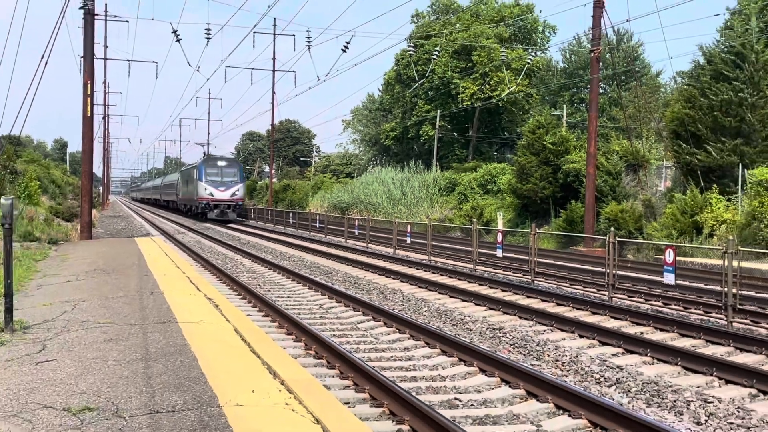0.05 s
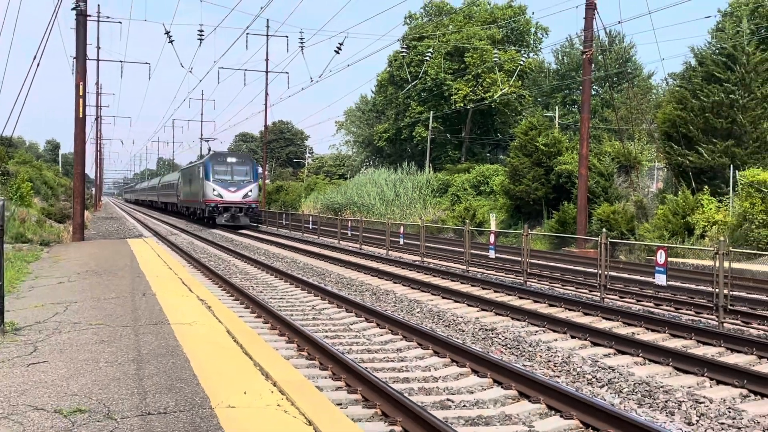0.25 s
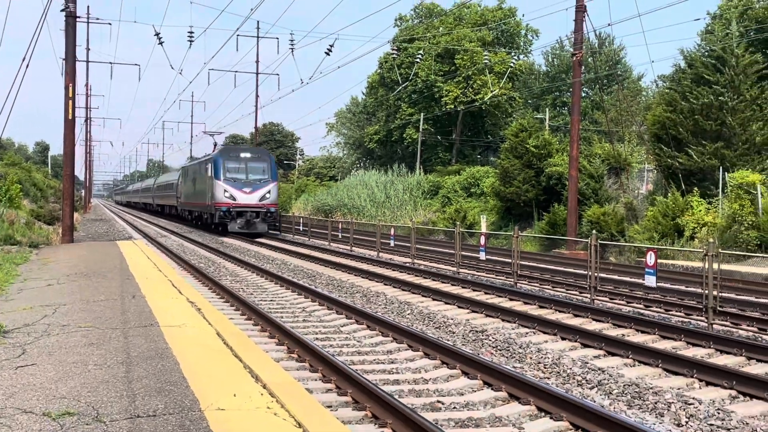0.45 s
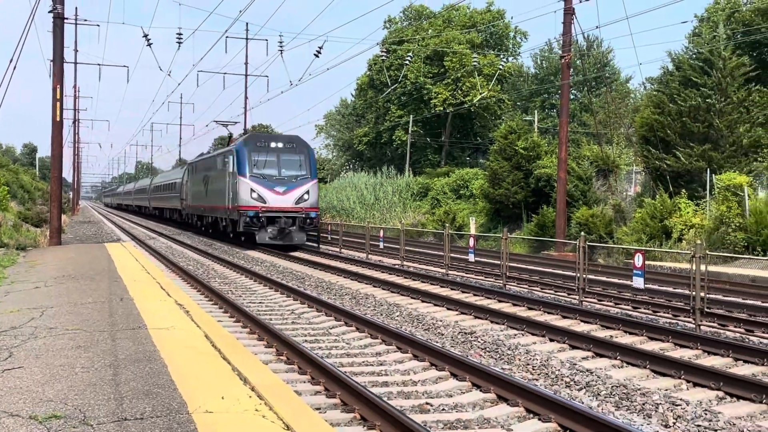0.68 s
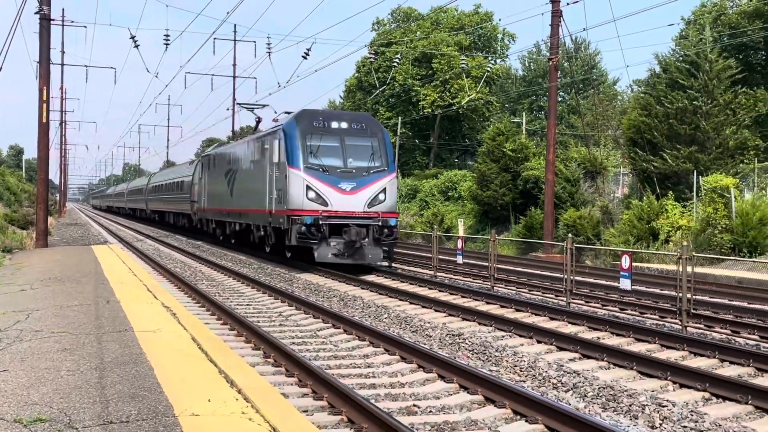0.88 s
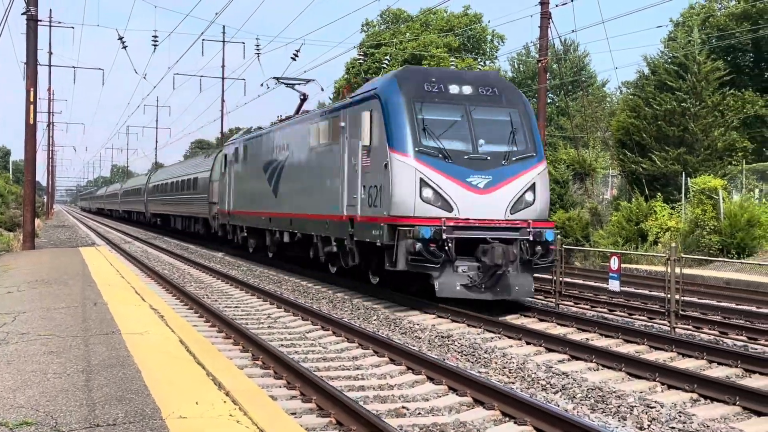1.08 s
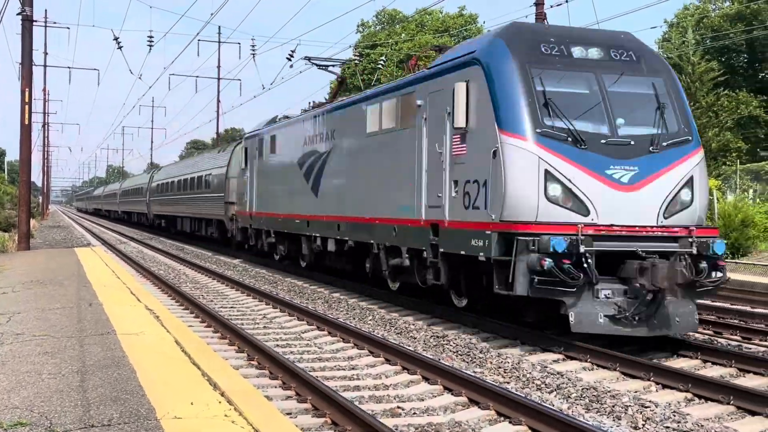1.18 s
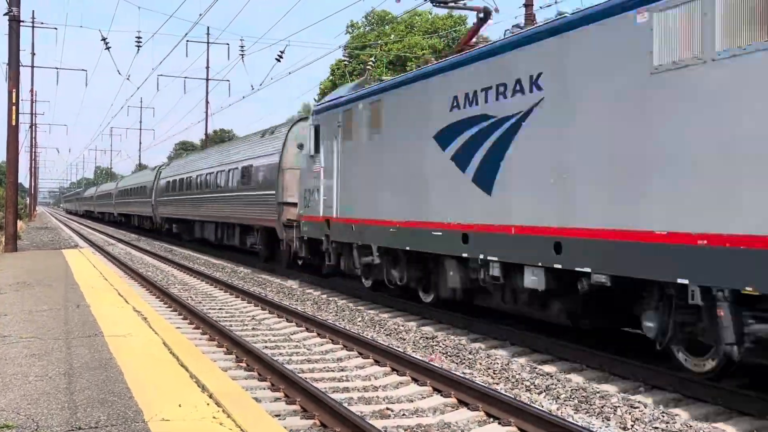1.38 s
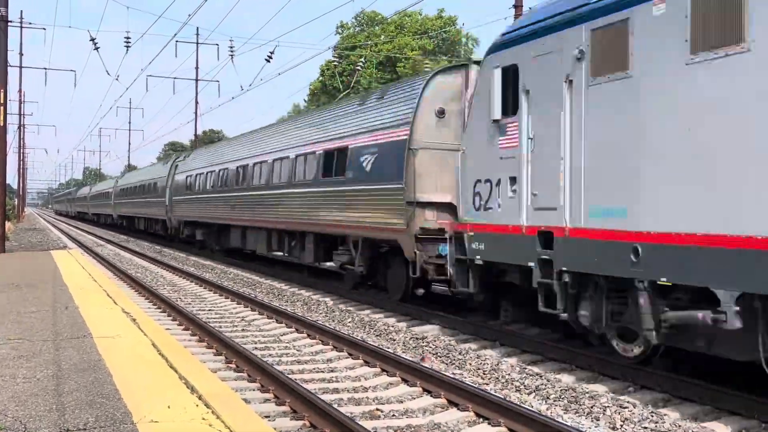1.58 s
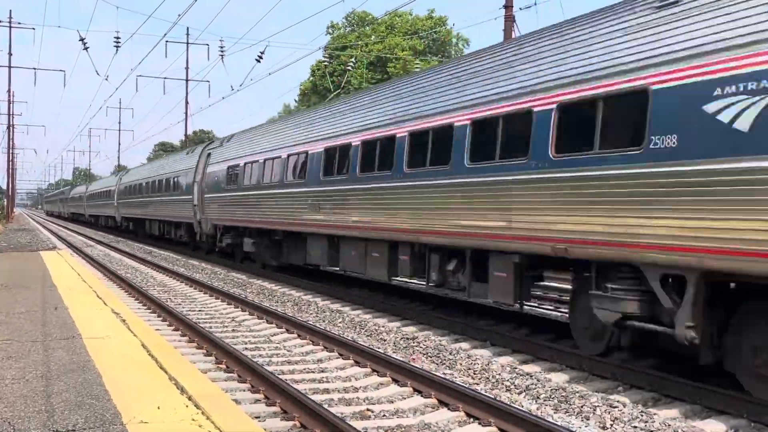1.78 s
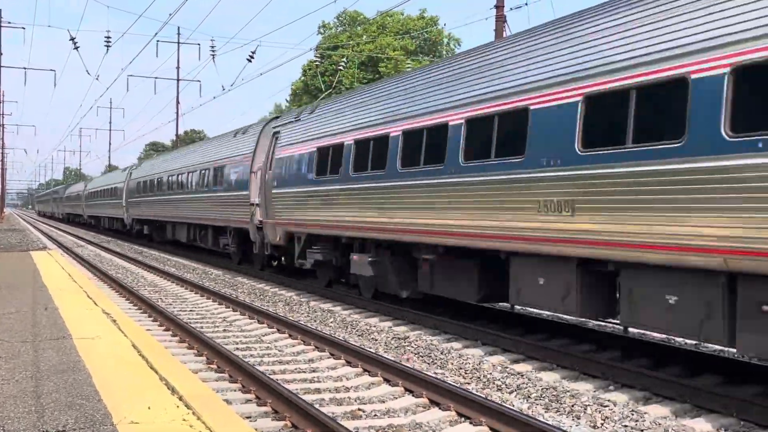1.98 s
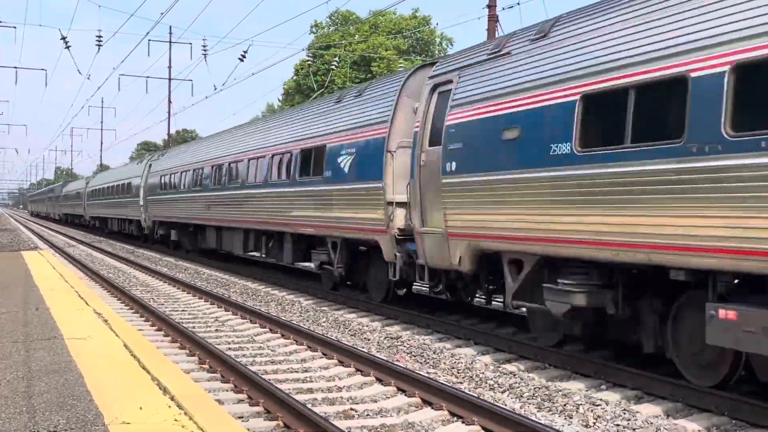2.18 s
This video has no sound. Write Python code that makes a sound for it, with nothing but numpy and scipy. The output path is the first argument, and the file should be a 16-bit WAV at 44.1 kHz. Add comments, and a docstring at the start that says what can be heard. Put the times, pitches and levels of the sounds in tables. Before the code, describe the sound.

A fast electric train rushes past a platform, rails hissing first, then roar and ringing wheels

```python
"""Electric train passing a platform

An electric locomotive and its coaches pass at speed. Rails hiss (shaped noise) and whistle (wavering
sines) before it arrives; roar and air rush (shaped noise, narrow howling resonances) swell. Bogies go by
with ringing wheels (noise through resonances that fall in pitch) and low buffeting (shaped noise), while
brief gliding tones and low thuds (sines in Gaussian envelopes) come from the running gear and the air."""
import sys
import numpy as np
from scipy import signal
from scipy.fft import rfft, irfft
from scipy.io import wavfile

SR = 44100
rng = np.random.default_rng(int(sys.argv[2]) if len(sys.argv) > 2 else 0)


def log_audio(samples):
    """Write samples as a 16-bit WAV file to the path given in sys.argv[1]."""
    # one column per channel
    frames = np.atleast_2d(samples).T
    # limit to full scale, then quantise
    limited = np.clip(frames, -1, 1)
    pcm = np.round(limited * 32767).astype(np.int16)
    wavfile.write(sys.argv[1], SR, pcm)


N = 99225
T = np.arange(N) / SR
STFT = dict(nperseg=1024, noverlap=768)  # samples
HZ, FRAME_S, _ = signal.stft(T, SR, **STFT)
IMAGE_EDGE_HZ = 2120  # above this the bearing-dependent channel differences fade

# phase and likeness of the channels; they oppose in two treble bands:
# f/Hz, phase lag of right/rad, likeness factor 0-1
TREBLE_PAIR = [(6200, 0, 1), (6500, -.45, .88), (7400, -1.4, .82), (7800, -3.1, 1), (8700, -3.2, 1),
               (9200, -4, .87), (10300, -5.2, .8), (10500, -6.283, 1), (12950, -6.283, 1), (13300, -8, .6),
               (13900, -9.425, 1)]


def amp(db):
    """Level to amplitude ratio: 20 dB is a factor of ten."""
    return 10 ** (np.asarray(db) / 20)


def curve(rows, t=T, order=1):
    """Linear interpolation of one table column over time."""
    rows = np.array(rows)
    return np.interp(t, rows[:, 0], rows[:, order])


def colour(rows, order=1):
    """Interpolation of one table column over logarithmic frequency."""
    rows = np.array(rows)
    return np.interp(np.log(HZ + 1), np.log(rows[:, 0]), rows[:, order])[:, None]


def spectra(x):
    """Short-time Fourier analysis: sound to a spectrum per frame."""
    return signal.stft(x, SR, **STFT)[2]


def wave(z):
    """Overlap-add synthesis: short-time spectra back to sound."""
    return signal.istft(z, SR, **STFT)[1][..., :N]


def wander(rate_hz):
    """Low-passed Gaussian noise: a smooth random fluctuation of unit rms."""
    spectrum = rfft(rng.standard_normal(2 * N))
    hz = np.fft.rfftfreq(2 * N, 1 / SR)
    x = irfft(spectrum * np.exp(-(hz / rate_hz) ** 2))[:N]
    return x / x.std()


def below(hz):
    """Low-pass weighting: near one under a frequency, falling steeply to zero above it."""
    return 1 / (1 + (HZ[:, None] / hz) ** 10)


def by_bearing(rows):
    """Change of bearing: blends the 'ahead' and 'alongside' columns as the train draws level."""
    # share of the alongside column: t/s, share 0-1
    alongside = [(1.35, 0.13), (1.6, 0.42), (1.75, .45), (1.92, 0.74)]
    share = np.clip(curve(alongside, FRAME_S), 0, 1)
    return colour(rows, order=1) * (1 - share) + colour(rows, order=2) * share


def peak(hz, width_hz):
    """Resonance: unit gain at the centre, falling with the square of the detuning."""
    return 1 / (1 + ((HZ[:, None] - hz) / (0.82 * width_hz)) ** 2)


def modes(rows, ratio=1):
    """Modal superposition: resonances add in power, their centres scaled by a Doppler ratio."""
    power = sum((amp(db) * peak(hz * ratio, width)) ** 2 for hz, width, db in rows)
    return np.sqrt(power)


def tone(hz, db):
    """Phase accumulation: a sine that follows a pitch and an rms level."""
    cycles = np.cumsum(hz * np.ones(N)) / SR + rng.random()
    return np.sqrt(2) * amp(db) * np.sin(2 * np.pi * cycles)


def swell(s, half, hz, db):
    """Gaussian envelope: a tone that rises and fades around one moment."""
    return tone(hz, db) * np.exp(-((T - s) / half) ** 2)


def howl(hz, width_hz, db):
    """Narrow-band noise: two random quadrature amplitudes, as of a mode kept ringing by turbulence."""
    turn = 2 * np.pi * hz * T
    return amp(db) * (wander(width_hz) * np.cos(turn) + wander(width_hz) * np.sin(turn))


def rush(gain, level_db, flutter_db, flutter_hz):
    """Turbulent noise: partly coherent channels given a spectrum, a level curve and a random flutter."""
    # likeness of left and right, before the image edge and treble factor:
    # f/Hz, ahead 0-1, alongside 0-1
    likeness = [(290, 1, 1), (470, 1, 0.63), (710, 0.69, 0.86), (940, 0.66, 1), (1150, 1, 0.88),
                (1580, 0.66, 0.2), (1630, 0, 0), (2100, .98, 0.81), (3140, 1, 1)]
    mid, side = spectra(rng.standard_normal((2, N)) * np.sqrt(SR / 2))  # unit density per Hz
    same = np.clip(1 - (1 - by_bearing(likeness)) * below(IMAGE_EDGE_HZ), 0, 1)
    same = same * colour(TREBLE_PAIR, order=2)
    mid = mid * np.sqrt((1 + same) / 2)
    side = side * np.sqrt((1 - same) / 2)
    noise = wave(np.array([mid + side, mid - side]) * gain)
    return noise * amp(level_db + flutter_db * wander(flutter_hz))


def rails():
    """Structure-borne sound: the rails hiss, and their high modes whistle ahead of the train."""
    # spectra before the level curves: f/Hz, density/dB per Hz
    hiss_spectrum = [(25, -88), (55, -58), (85, -56.5), (150, -73), (330, -68.5), (460, -71), (700, -63),
                     (1150, -59.5), (1500, -65), (1950, -68), (2750, -65.5), (3600, -73.5), (8000, -83.5),
                     (14000, -100)]
    sizzle_spectrum = [(6000, -110), (9000, -80.5), (11500, -81.5), (12800, -84), (16000, -91)]  # hiss around the whistling modes
    # level curves: t/s, level/dB
    hiss_level = [(0, -1.5), (.45, 1), (.9, 2), (1.25, 3.5), (1.5, -34), (1.85, -30), (2.25, -5.5)]
    whistle_level = [(0, -0.5), (.3, 0.5), (.9, 1), (1.15, 2), (1.35, -31), (1.8, -27), (2.25, -12)]
    # high modes carried along the rails, before the level curve: f/Hz, level/dB
    whistles = [(9720, -79), (10440, -66), (11205, -53.5), (11910, -54), (12680, -67), (13430, -64)]
    waver_hz, flicker_db, rate_hz = 15, 2.5, 59  # rms pitch waver, rms flicker, rate of both

    hiss = rush(amp(colour(hiss_spectrum)), curve(hiss_level), flutter_db=0.93, flutter_hz=70)
    sizzle = rush(amp(colour(sizzle_spectrum)), curve(whistle_level), flutter_db=2.2, flutter_hz=60)
    singing = sum(tone(hz + waver_hz * wander(rate_hz), db + flicker_db * wander(rate_hz))
                  for hz, db in whistles)
    return hiss + sizzle + singing * amp(curve(whistle_level))


def running_gear():
    """Frequency modulation: gliding, wavering tones of the running gear, with steady thuds of air."""
    # narrow tones: t/s, envelope 1/e half length/s, f/Hz at t, glide/Hz per s, width/Hz, level/dB
    gear_tones = [(0.315, 0.48, 82, -0.5, 2.6, -41), (1.191, 0.27, 378, -15, 5, -35.5),
                  (1.7, .09, 314, -69, 10, -34.5), (1.915, .03, 1162, -400, 25, -17.5),
                  (1.99, 0.059, 1157, -100, 10, -26.5)]
    # low thuds of air under the train: t/s, envelope 1/e half length/s, f/Hz, level/dB
    thuds = [(1.5, 0.027, 91, -26.5), (1.595, 0.024, 92.2, -28.5), (1.86, 0.022, 125, -32.5),
             (1.95, 0.016, 85.3, -36)]
    out = sum(swell(*row) for row in thuds)
    for s, half, hz, glide, width, db in gear_tones:
        pitch = hz + glide * (T - s) + width / 2 * wander(width * 2)
        out = out + swell(s, half, pitch, db)
    return out


def coaches():
    """Broadband rolling noise: low buffeting under the train and the roll of the coaches."""
    # spectra before the level curves: f/Hz, density/dB per Hz
    rumble_spectrum = [(22, -90), (50, -58), (90, -44.5), (130, -49), (190, -50.5), (260, -49.5),
                       (360, -48.5), (420, -58), (520, -60), (900, -79.5)]
    roll_spectrum = [(200, -68.5), (450, -61.5), (560, -58), (780, -60), (950, -63.5), (1400, -58.5),
                     (1750, -73.5), (2150, -61.5), (3200, -84), (8000, -107)]
    # level curves: t/s, level/dB
    rumble_level = [(0, -25.5), (1, -19.5), (1.12, -7), (1.27, -1), (1.45, -5.5), (1.62, -6), (1.69, -5.5),
                    (1.78, -12), (1.87, -10), (2.03, -14), (2.25, -24)]
    roll_level = [(1.2, -45), (1.55, -0.5), (1.9, -2), (2.25, -1)]
    rumble = rush(amp(colour(rumble_spectrum)), curve(rumble_level), flutter_db=0.7, flutter_hz=25)
    roll = rush(amp(colour(roll_spectrum)), curve(roll_level), flutter_db=1.1, flutter_hz=30)
    return rumble + roll


def locomotive():
    """Flow noise and resonance: the locomotive's roar and howl, and air rushing along the train."""
    # spectra before the level curves: f/Hz, density/dB per Hz
    roar_spectrum = [(300, -69.5), (440, -59.5), (530, -50.5), (700, -47.5), (800, -50), (920, -54),
                     (1150, -49.5), (1400, -47.5), (1600, -49.5), (2000, -67.5), (3000, -77)]
    air_spectrum = [(500, -69), (1800, -55), (2700, -59.5), (3400, -59), (4200, -59.5), (6000, -62.5),
                    (8000, -68), (10500, -70.5), (12300, -89), (13500, -96), (16000, -92)]
    # level curves: t/s, level/dB
    roar_level = [(0, -30), (.3, -21), (.55, -12.5), (.75, -11), (.87, -7), (1.05, -6.5), (1.22, 0.5),
                  (1.38, -4.5), (1.47, -11.5), (1.62, -13.5), (1.8, -16.5), (2.25, -32)]
    air_level = [(0, -20.5), (.27, -16), (.38, -11), (.75, -10.5), (1.03, -9.5), (1.25, 0.5), (1.34, 1.5),
                 (1.43, -1.5), (1.61, -0.5), (1.635, -6), (1.71, -2), (1.8, -8.5), (1.95, -14.5),
                 (2.12, -16), (2.25, -14.5)]
    # narrow resonances in the roar, before its level curve: f/Hz, random-amplitude rate/Hz, level/dB
    roar_modes = [(572.2, 29, -31), (683, 23, -27), (732.5, 22, -27.5)]
    # the air rush dulls once the nose has passed: t/s, slope above the knee/dB per octave
    dulling = [(0, -0.5), (1.18, 4), (1.35, -7.5), (1.5, -8.5), (2.25, 0.5)]
    knee_hz = 4100

    octaves = np.log2(np.maximum(HZ / knee_hz, 1))[:, None]
    air_gain = amp(colour(air_spectrum) + octaves * curve(dulling, FRAME_S))
    air = rush(air_gain, curve(air_level), flutter_db=0.54, flutter_hz=110)
    roar = rush(amp(colour(roar_spectrum)), curve(roar_level), flutter_db=0.84, flutter_hz=39.3)
    howling = sum(howl(*row) for row in roar_modes)
    return air + roar + amp(curve(roar_level)) * howling


def wheels():
    """Doppler shift: two ringing clusters, one or both swelling at each bogie, fall as they recede."""
    # wheel modes before the Doppler ratio and level curves: f/Hz, width/Hz, density/dB per Hz
    low_ring = [(1286, 230, -45), (1332, 51, -40.5), (1370, 47, -38.5)]
    high_ring = [(2680, 490, -52), (2500, 50, -47.5), (2695, 52, -48.5)]
    # level of the clusters before the bogie changes: t/s, low ring level/dB, high ring level/dB
    ring_level = [(0, -16.5, -29), (.45, -11.5, -15.5), (.65, -15, -21), (1.05, -10, -12), (1.25, -4, -5.5),
                  (1.42, -2, -1.5), (1.56, -1.5, -1), (1.76, -8.5, -1), (1.87, -10.5, -8), (2, -14, -12.5),
                  (2.25, -17, -14.5)]
    # bogies going by, level changes up or down:
    # t/s, envelope 1/e half length/s, low ring change/dB, high ring change/dB
    bogies = [(1.305, 0.0056, 2.5, 2.5), (1.357, 0.02, 7, -3), (1.624, 0.025, 7, -0.5),
              (1.697, 0.023, 4.5, 6)]
    # pitch of the wheels: t/s, frequency ratio
    doppler = [(0, 1.016), (1.35, 1.04), (1.7, 1.016), (1.82, 0.95), (1.92, 0.9), (2.25, .83)]

    out, ratio = 0, curve(doppler, FRAME_S)
    for k, cluster in enumerate([low_ring, high_ring]):
        change = sum(changes[k] * np.exp(-((T - s) / half) ** 2) for s, half, *changes in bogies)
        level = curve(ring_level, order=k + 1) + change
        out = out + rush(modes(cluster, ratio), level, flutter_db=0.5, flutter_hz=35)
    return out


def scene():
    """Linear superposition: the whole train, heard from the platform."""
    return rails() + running_gear() + coaches() + locomotive() + wheels()


def rounded(x):
    """Soft saturation: linear up to a knee, then a tanh bend on the tallest peaks."""
    knee, headroom = 0.6, 0.3  # amplitude; the ceiling is their sum
    excess = np.maximum(abs(x) - knee, 0)
    return np.clip(x, -knee, knee) + np.sign(x) * headroom * np.tanh(excess / headroom)


def record(dry):
    """Interchannel phase and level differences after a low cut, then soft peaks and a band limit."""
    # phase lag of right, before the image edge: f/Hz, ahead/rad, alongside/rad
    pair_phase = [(375, 0.38, -0.5), (540, 0.27, -3.1), (810, -0.47, -1.3), (1163, -0.58, -3.5),
                  (1490, 0.29, -1), (2050, -0.064, 0)]
    # left over right, before the image edge: f/Hz, ahead level/dB, alongside level/dB
    balance = [(400, -1.5, 0.5), (720, -0.5, 0), (1010, 1.5, 4.5), (1280, 0.5, 7.5), (1600, -1, -7),
               (1690, -16.5, -6), (1840, 0.5, 0), (2520, -0.5, 16), (3100, -0.5, 10)]
    # added phase lag in the bass, before its upper edge: t/s, phase/rad
    bass_spread = [(.52, -0.83), (.64, -2.27), (.97, -1.9), (1.07, 0.18)]
    bass_edge_hz, spread_lag_s_per_hz = 420, 0.00048  # higher frequencies follow the curve later
    # a narrow band that turns out of phase, at its centre: t/s, phase/rad
    hollow_phase = [(.6, 0), (1.0, -2), (1.5, -3.5), (2.25, 0.6)]
    hollow_hz, hollow_width_hz = 439, 72  # centre, 1/e half width
    low_cut_hz, high_cut_hz = 42, 15800

    spread_time = FRAME_S - spread_lag_s_per_hz * HZ[:, None]
    spread = below(bass_edge_hz) * curve(bass_spread, spread_time)
    hollow_band = np.exp(-((HZ[:, None] - hollow_hz) / hollow_width_hz) ** 2)
    hollow = hollow_band * curve(hollow_phase, FRAME_S)
    phase = by_bearing(pair_phase) * below(IMAGE_EDGE_HZ) + colour(TREBLE_PAIR) + spread + hollow
    lean = amp(by_bearing(balance) * below(IMAGE_EDGE_HZ))

    low_cut = signal.butter(4, low_cut_hz, "highpass", fs=SR, output="sos")
    dry = signal.sosfilt(low_cut, dry)
    left, right = spectra(dry) * np.sqrt(2 / (1 + lean ** 2))  # the lean keeps the total power
    heard = wave(np.array([left * lean, right * np.exp(-1j * phase)]))
    band_limit = signal.firwin(511, high_cut_hz, window=("kaiser", 9), fs=SR)
    return signal.oaconvolve(rounded(heard), band_limit[None], "same")


dry = scene()
out = record(dry)
log_audio(out)
```